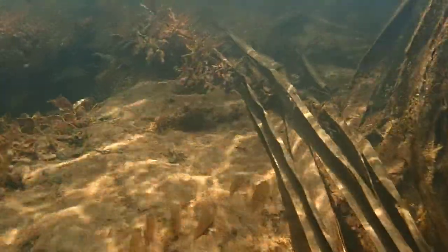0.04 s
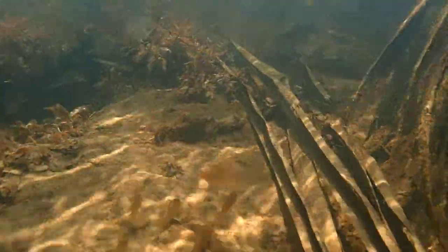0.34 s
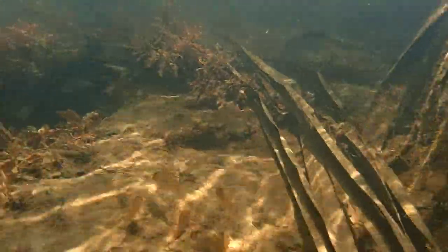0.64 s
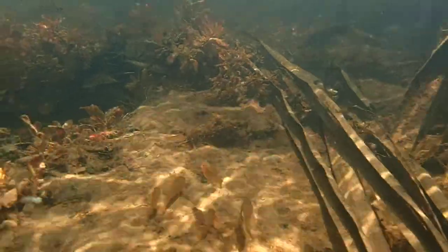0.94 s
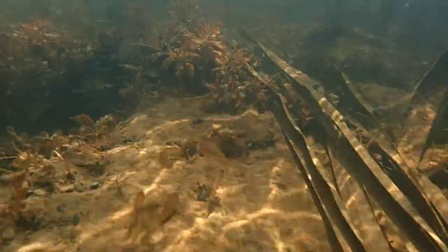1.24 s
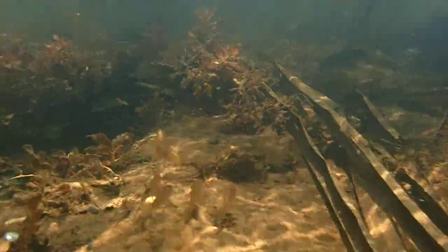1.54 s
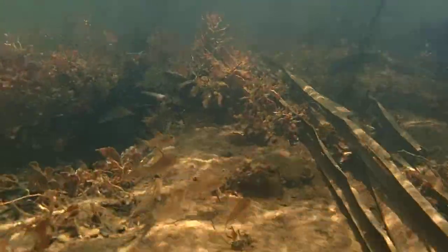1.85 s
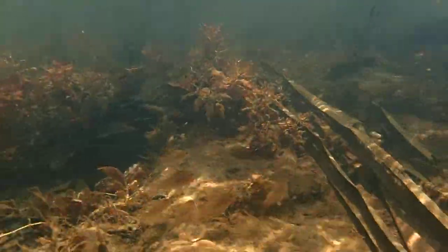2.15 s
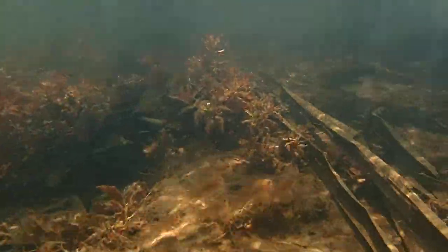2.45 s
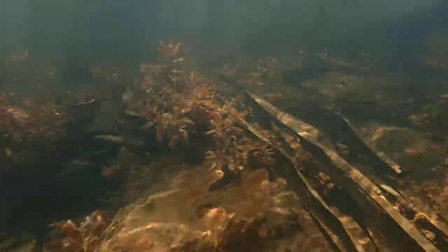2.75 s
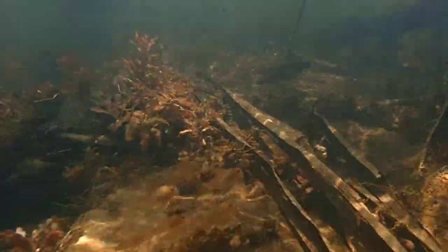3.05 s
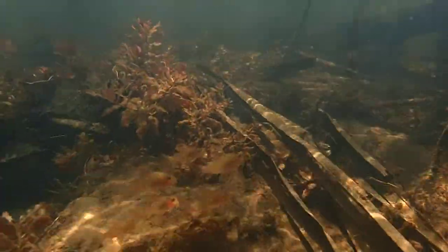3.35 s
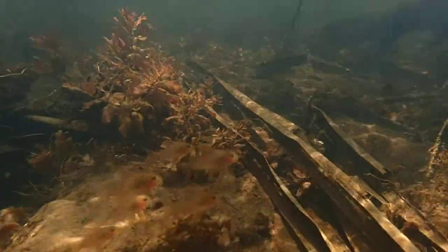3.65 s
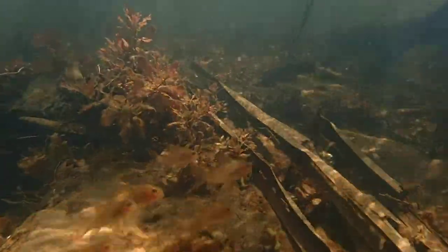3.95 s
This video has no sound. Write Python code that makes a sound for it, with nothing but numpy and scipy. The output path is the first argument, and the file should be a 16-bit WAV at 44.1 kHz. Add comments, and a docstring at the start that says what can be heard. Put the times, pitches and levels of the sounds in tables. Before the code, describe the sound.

A low, rapid purring underwater, over surging water, hiss and a few bubbles.

```python
"""Shallow water, heard from inside a submerged camera housing. Over microphone hiss and a deep rumble,
a purr opens the scene: thirty soft pulses a second, strong and weak in turn (perhaps a small motor in
the camera). A few bubbles ring, a sharp snap cracks near 0.9 s, and water surges past, rumbling in the
housing's resonances. At 2.2 s the purr drops out, leaving gentler surges and faint knocks. Near 3.7 s
it returns, amid a cluster of bubbles and a last swell of water."""
import sys
import numpy as np
from scipy import signal
from scipy.fft import rfft, irfft
from scipy.io import wavfile

SR = 44100
rng = np.random.default_rng(int(sys.argv[2]) if len(sys.argv) > 2 else 0)


def generate_wav(signal):
    """Clip the signal to [-1, 1] and save it as 16-bit WAV at the path in sys.argv[1]."""
    frames = np.transpose(np.atleast_2d(signal))
    scaled = np.clip(frames, -1, 1) * 32767
    pcm = np.round(scaled).astype(np.int16)
    wavfile.write(sys.argv[1], SR, pcm)


N = 176400
TIME = np.arange(N) / SR
FREQS = np.maximum(np.fft.rfftfreq(N, 1 / SR), 1)
SHOT_TIME = TIME[:SR // 5]  # time axis of a one-shot

# EQ of the microphone hiss: (frequency [Hz], relative level [dB])
HISS_EQ = [(1500, -10.5), (2200, -7.5), (2700, -16.5), (3100, -10), (3400, -23), (3650, -15), (3900, -24),
           (4300, -19), (4620, -8.5), (4820, -21.5), (5000, -7), (5900, -5.5), (6650, -0.5), (7200, -2.5),
           (8050, 1), (9200, -6.5), (11000, -7.5), (15800, -9)]
# EQ of the deep rumble: (frequency [Hz], relative level [dB])
RUMBLE_EQ = [(15, -8), (30, -3), (60, 4), (105, 5.5), (150, 2), (300, -3.5), (520, -1), (800, -6.5),
             (1300, -12.5), (1700, -15.5), (2000, -23.5), (4000, -48)]
# EQ of a snap: (frequency [Hz], relative level [dB])
SNAP_EQ = [(700, -7), (1400, -2), (2400, -10), (4000, -24.5), (5300, -5), (6700, 7.5), (8200, -1),
           (10000, -15), (16000, -13.5)]
# snap cues: (time [s], relative level [dB])
SNAP_CUES = [(.322, -35), (0.872, -38), (.9362, -20), (1.615, -39), (1.637, -40), (3.352, -42),
             (3.367, -44), (3.461, -40), (3.683, -43), (3.778, -37), (3.968, -42)]
# bubble cues: (time [s], pitch [Hz], level [dB], decay T60 [s])
BUBBLE_CUES = [(0.192, 955, -23, 0.023), (.575, 2500, -51, .025), (.632, 1820, -47, .03),
               (0.753, 990, -29, 0.055), (3.35, 735, -37.5, 0.045), (3.3635, 1764, -42, 0.058),
               (3.43, 1250, -48, 0.049), (3.442, 1273, -40, 0.13), (3.444, 810, -39, .04),
               (3.457, 2120, -52, 0.038), (3.532, 1350, -35, 0.02), (3.613, 2800, -56, .02),
               (3.778, 2950, -48.5, 0.019), (3.804, 1600, -31, 0.05), (3.827, 1440, -29, 0.039),
               (3.836, 3120, -53, 0.027), (3.856, 1650, -43, .04)]
# knocks on the housing, plus the low body of the snap at 0.936 s: (time [s], pitch [Hz], level [dB], length
# [s], left over right [dB])
KNOCK_CUES = [(0.7465, 764, -18, 0.0051, -6), (0.9363, 1360, -26.5, 0.0017, -2),
              (2.5035, 1470, -40.5, 0.003, 1), (2.8891, 1070, -21, 0.003, 3),
              (2.8912, 785, -22, 0.0041, -9), (2.961, 1570, -50, 0.0054, -3),
              (2.999, 1650, -48.5, 0.0037, -3), (3.208, 510, -26, 0.0076, 12), (3.344, 460, -42, .008, 14),
              (3.459, 1170, -33.5, 0.005, 0), (3.461, 460, -30.5, 0.0054, 11),
              (3.681, 2100, -56, 0.0035, -1), (3.781, 694, -26.5, 0.0052, 0)]
# resonances of the housing:
# (frequency [Hz], width [Hz], relative level [dB], left over right [dB], left phase lead [rad])
HOUSING_MODES = [(205.7, 70, -11.5, 6.5, 0), (317, 89, -1, 8, 0.031), (482, 86, -6, 12.5, 0.4),
                 (566, 49, -7.5, 27, 0.41), (659, 44, -2.5, 2.5, -2.23), (781, 100, -11, -10, -0.89),
                 (955, 87, -18, -4, 0.38), (1235, 82, -17.5, -.5, -0.079), (1496, 117, -38, -22, -0.85),
                 (1567, 62, -40, -5, 0), (2230, 100, -46.5, -22, 0.25), (3250, 180, -36.5, -2, .5)]
# fader curve of the surging water: (time [s], relative level [dB])
FLOW_FADER = [(0, -43), (.09, -42), (.25, -46.5), (.42, -52.5), (.5, -46.5), (.6, -55), (.7, -46),
              (.77, -35.5), (.87, -40), (.94, -36), (1.03, -36.5), (1.2, -33.5), (1.4, -32), (1.57, -32),
              (1.7, -39.5), (1.8, -57.5), (1.9, -54.5), (2.0, -43.5), (2.28, -45), (2.34, -36.5),
              (2.42, -38.5), (2.48, -45.5), (2.54, -39), (2.7, -41), (2.88, -50), (3.0, -44), (3.2, -48.5),
              (3.25, -56.5), (3.43, -64.5), (3.5, -39), (3.66, -37.5), (3.8, -33.5), (3.88, -38.5),
              (4, -32.5)]
# fader curves of the purr, whose pulses alternate between two levels: (time [s], main pulse level [dB],
# alternate pulse level [dB])
PURR_FADER = [(0, -20, -22.5), (.65, -19, -23.5), (1.1, -19, -25), (1.5, -19.5, -20.5), (1.9, -17.5, -25.5),
              (2.15, -17, -22.5), (2.19, -66, -54), (3.45, -57, -72), (3.6, -52, -37), (3.75, -24, -63),
              (3.87, -23, -19.5), (4, -20.5, -26)]
# a pulse's blip, left then right: (end pitch [Hz], glide time constant [s], length [s], trim [dB])
BLIP_PER_MIC = [(583, .0011, 0.0073, -1), (726, 0.00076, .008, 1)]
# faint bright edge of a pulse: (frequency [Hz], relative level [dB], decay T60 [s])
EDGE_PARTIALS = [(1250, -29, 0.011), (1530, -43, 0.011), (2075, -44, 0.0068), (3026, -45, 0.023)]
# reflections of a pulse: (delay [s], left gain [dB], right gain [dB])
PULSE_ECHOES = [(.0068, -18, -29), (.0112, -9.5, -16), (.0181, -13.5, -40.5), (.0245, -40, -18.5)]


def from_db(db):
    return 10 ** (np.asarray(db) / 20)


def unit_rms(x):
    return x / np.sqrt(np.mean(x ** 2) + 1e-20)


def pan(left_over_right_db):
    """Left and right gains with a mean of one."""
    gains = from_db([[left_over_right_db / 2], [-left_over_right_db / 2]])
    return gains / gains.mean()


def equalise(x, curve):
    """Apply an EQ of (frequency [Hz], level [dB]) and normalise to rms 1."""
    hz, db = np.transpose(curve)
    gain = from_db(np.interp(np.log(FREQS), np.log(hz), db))
    return unit_rms(irfft(rfft(x) * gain, N))


def drift(rate_hz):
    """A smooth random modulator of rms 1."""
    return unit_rms(irfft(rfft(rng.standard_normal(N)) / (1 + (FREQS / rate_hz) ** 2), N))


def place(track, start, sound):
    """Mix a one-shot in at start [s]."""
    i = int(np.clip(start * SR, 0, N - 1))
    track[..., i:i + sound.shape[-1]] += sound[..., :N - i]


def decay(t60):
    """An envelope that falls 60 dB in t60 seconds."""
    return from_db(-60 * SHOT_TIME / t60)


def tone(hz):
    """A one-shot sine; the pitch may be a curve."""
    return np.sin(2 * np.pi * np.cumsum(hz * np.ones(len(SHOT_TIME))) / SR)


def blip(hz, length):
    """A few cycles that swell and fade."""
    swell = np.sin(np.pi * np.minimum(SHOT_TIME / length, 1)) ** 1.105
    return -swell * tone(hz)


def microphone_hiss():
    """Each microphone adds its own steady noise."""
    return from_db(-56.5) * pan(5) * equalise(rng.standard_normal((2, N)), HISS_EQ)


def deep_rumble():
    """A low bed, mostly shared by both microphones, that wavers and creeps up in level."""
    waver_db, rise_db_per_s = 2.5, .5
    mid, side = equalise(rng.standard_normal((2, N)), RUMBLE_EQ)
    level_db = -53 + waver_db * drift(rate_hz=5.7) + rise_db_per_s * (TIME - TIME.mean())
    return from_db(level_db) * pan(5.5) * (mid + from_db(-6) * side * [[1], [-1]])


def snaps():
    """Bright cracks on the left among fainter random crackles, each with one close reflection."""
    crackles_per_s, echo_s, echo_db = 12, 0.0017, -9.5
    duration, candidates = N / SR, 60
    crackles = [(when * duration, -50 + 6 * size) for when, size, odds in rng.random((candidates, 3))
                if odds < crackles_per_s * duration / candidates]
    clicks = np.zeros(N)
    for start, db in list(SNAP_CUES) + crackles:
        place(clicks, start, from_db([db]))
        place(clicks, start + echo_s, from_db([db + echo_db]))
    cracks = equalise(clicks, SNAP_EQ)
    return cracks * clicks.max() / cracks.max() * pan(17)


def bubbles():
    """Small bubbles ring briefly, wobbling and rising a little in pitch."""
    attack_s, rise_per_s, wobble_depth = 0.00079, 0.2, 0.028
    attack = 1 - np.exp(-SHOT_TIME / attack_s)
    wobble = wobble_depth * drift(rate_hz=380)
    track = np.zeros(N)
    for start, hz, db, t60 in BUBBLE_CUES:
        pitch = hz * (1 + rise_per_s * SHOT_TIME + np.interp(start + SHOT_TIME, TIME, wobble))
        place(track, start, from_db(db) * attack * decay(t60) * tone(pitch))
    return track


def knocks():
    """Dull taps on the housing that the water damps within a few cycles; one gives the snap near 0.94 s its low
    body."""
    track = np.zeros((2, N))
    for start, hz, db, length, pan_db in KNOCK_CUES:
        place(track, start, from_db(db) * pan(pan_db) * blip(hz, length))
    return track


def water_flow():
    """Surging water stirs the housing's resonances; each reaches the two microphones differently."""
    trim_db, flutter_db, low_cut_hz, high_cut_hz = 3, 1.5, 164, 1760
    housing = 0
    for hz, width_hz, db, pan_db, lead in HOUSING_MODES:
        resonance = 1 / (1 + ((FREQS - hz * hz / FREQS) / width_hz) ** 2)
        stereo_phase = np.exp(.5j * lead * np.array([[1], [-1]]))
        housing = housing + from_db(db) * pan(pan_db) * resonance * stereo_phase
    band = 1 / np.sqrt(1 + (FREQS / high_cut_hz) ** 6 + (low_cut_hz / FREQS) ** 6)
    eddies = rng.standard_normal(N) * from_db(flutter_db * drift(rate_hz=49))
    rumble = unit_rms(irfft(rfft(eddies) * band * housing, N))
    return rumble * from_db(trim_db + np.interp(TIME, *np.transpose(FLOW_FADER)))


def purr():
    """Pulses, strong and weak in turn: each a falling blip with a bright edge, echoes and a tail."""
    pulses_per_s, first_pulse_s, jitter_s = 29.97, .0121, 0.00026
    start_hz, pitch_spread, edge_attack_s = 1476, 0.015, 0.00052
    tail_db, tail_t60 = -10.5, 0.044
    starts = np.arange(first_pulse_s, N / SR, 1 / pulses_per_s)
    when, main_db, alternate_db = np.transpose(PURR_FADER)
    is_main = np.arange(len(starts)) % 2
    pulse_db = np.where(is_main, np.interp(starts, when, main_db), np.interp(starts, when, alternate_db))
    _, lateness, detunes = rng.standard_normal((3, len(starts)))
    edge = sum(from_db(db) * decay(t60) * np.sin(2 * np.pi * hz * SHOT_TIME)
               for hz, db, t60 in EDGE_PARTIALS)
    edge *= 1 - np.exp(-(SHOT_TIME / edge_attack_s) ** 2)
    first_echo_s = PULSE_ECHOES[0][0]
    tail = rng.standard_normal(len(SHOT_TIME)) * decay(tail_t60) * (SHOT_TIME > first_echo_s)
    channels = []
    for mic, (end_hz, glide_s, length, trim_db) in enumerate(BLIP_PER_MIC):
        glide = end_hz + (start_hz - end_hz) * np.exp(-SHOT_TIME / glide_s)
        pulses = np.zeros(N)
        for start, db, detune in zip(starts + jitter_s * lateness, pulse_db, detunes):
            body = blip(glide * (1 + pitch_spread * detune), length)
            place(pulses, start, from_db(db + trim_db) * (body + edge))
        reflections = from_db(tail_db) * tail / np.linalg.norm(tail)
        for delay, *echo_db in PULSE_ECHOES:
            place(reflections, delay, from_db([echo_db[mic]]))
        channels.append(pulses + signal.fftconvolve(pulses, reflections)[:N])
    return np.array(channels)


def scene():
    """The stereo mix at the two microphones."""
    return purr() + water_flow() + knocks() + bubbles() + snaps() + microphone_hiss() + deep_rumble()


def record(dry):
    """The housing blocks a narrow band, and a steep low-pass takes off the very top."""
    notch_hz, cutoff_hz = 1865, 15850
    notched = signal.lfilter(*signal.iirnotch(notch_hz, Q=18.4, fs=SR), dry)
    return signal.sosfilt(signal.ellip(12, .1, 80, cutoff_hz, fs=SR, output="sos"), notched)


dry = scene()
out = record(dry)
generate_wav(out)
```